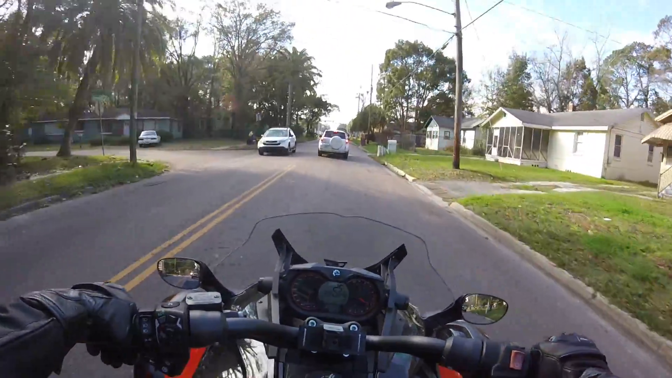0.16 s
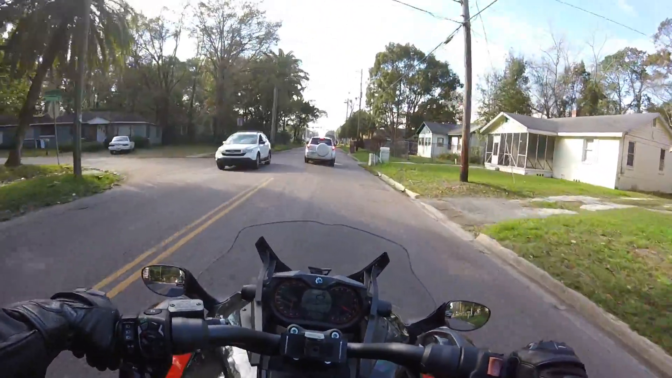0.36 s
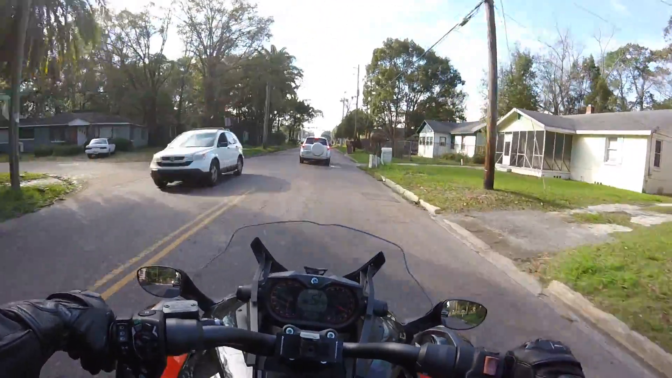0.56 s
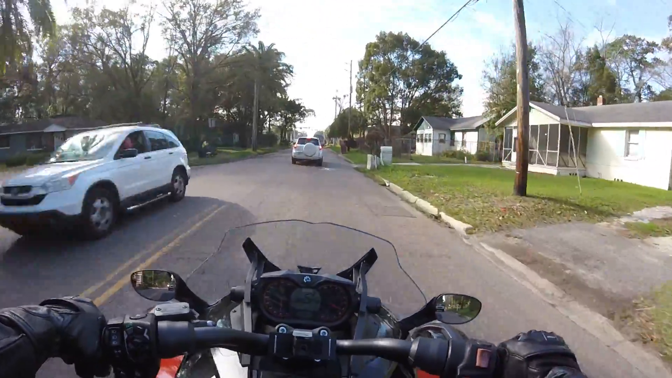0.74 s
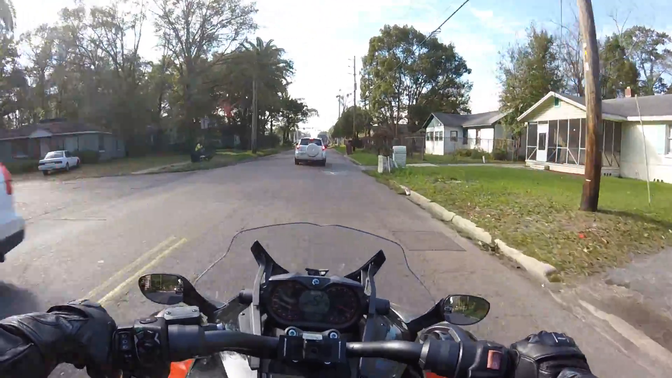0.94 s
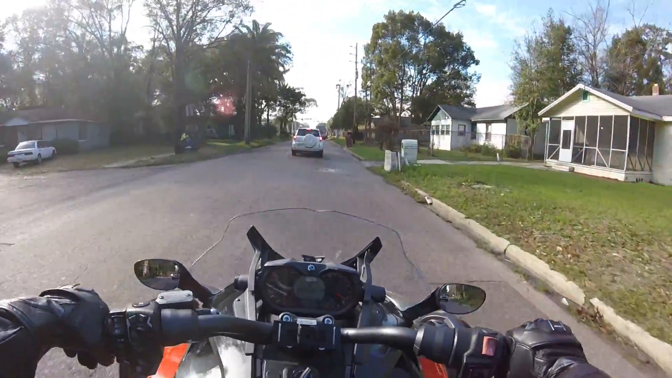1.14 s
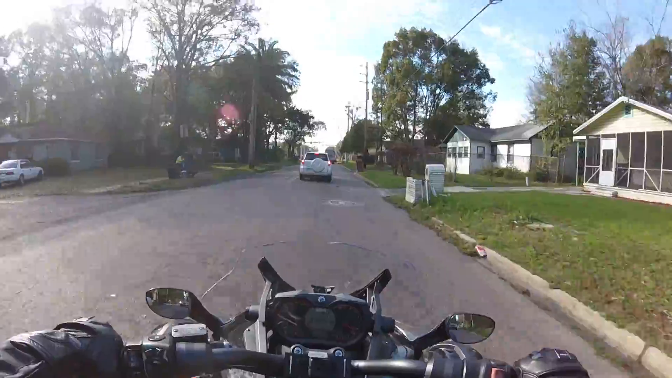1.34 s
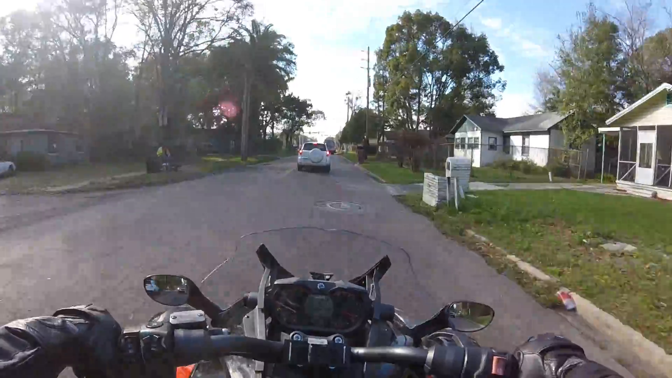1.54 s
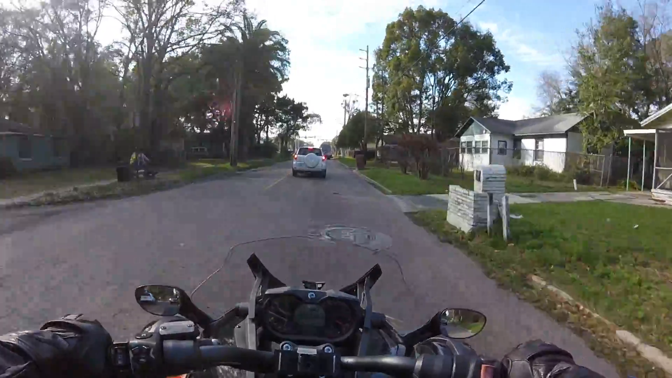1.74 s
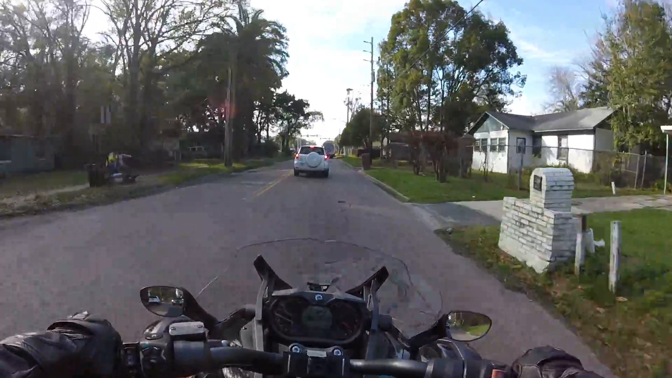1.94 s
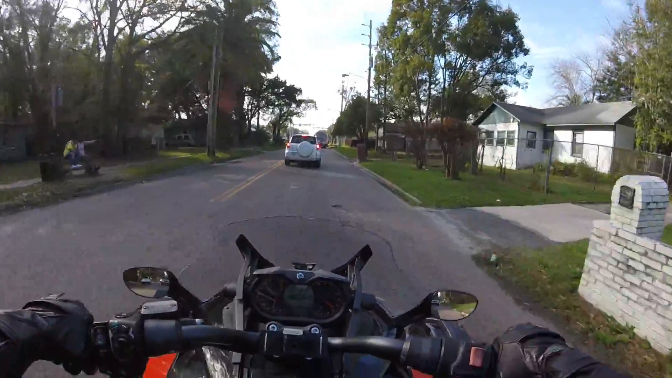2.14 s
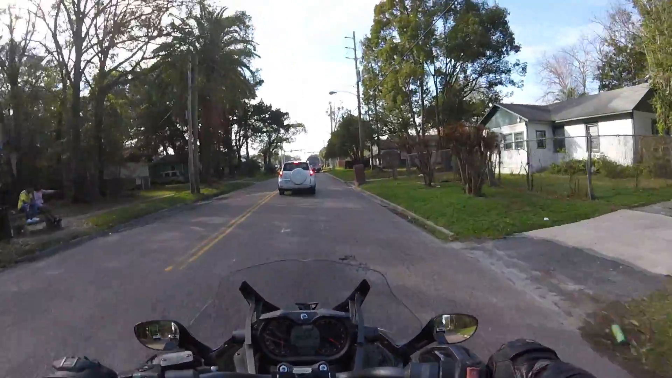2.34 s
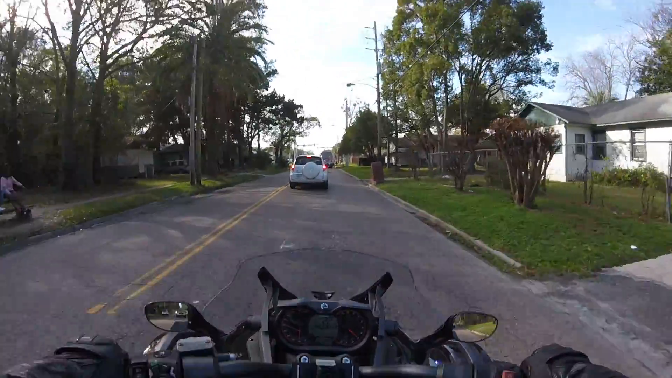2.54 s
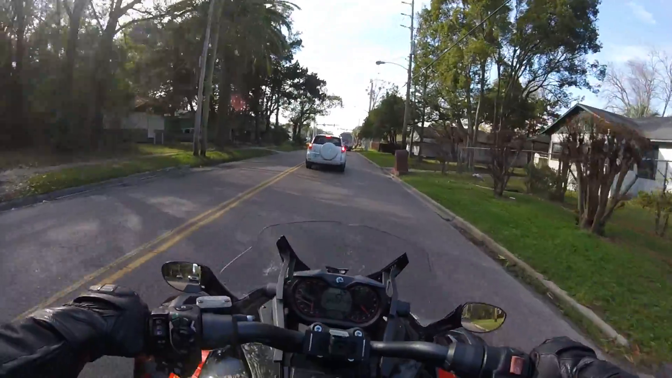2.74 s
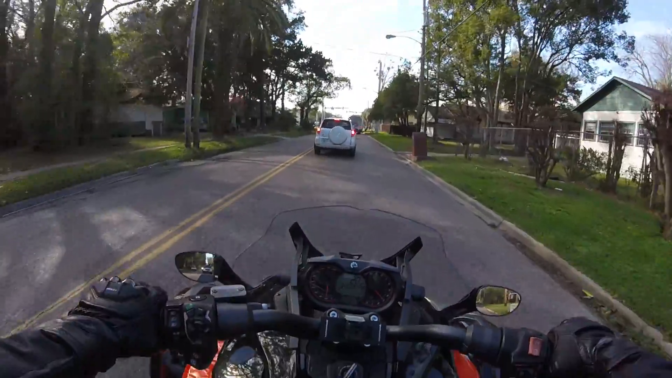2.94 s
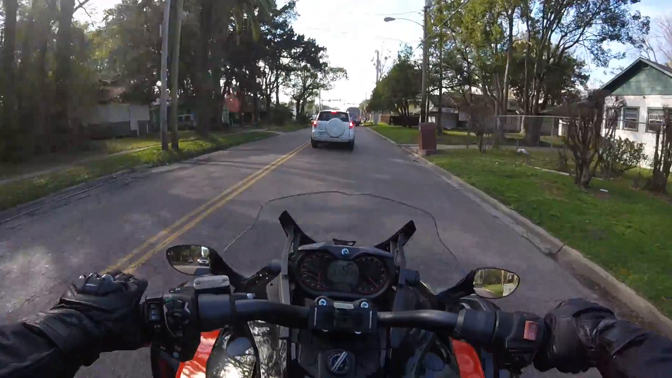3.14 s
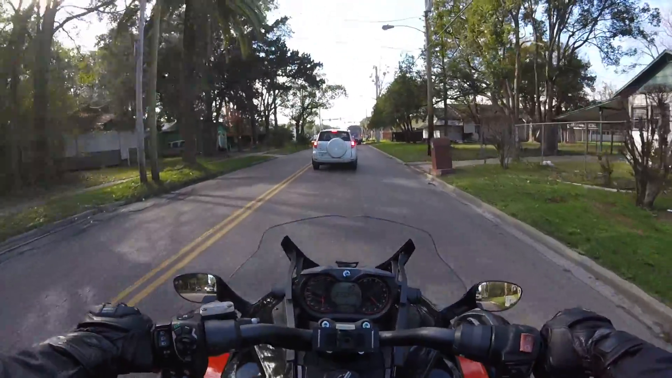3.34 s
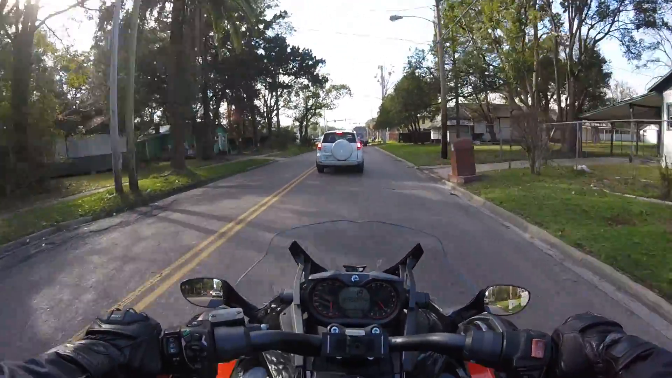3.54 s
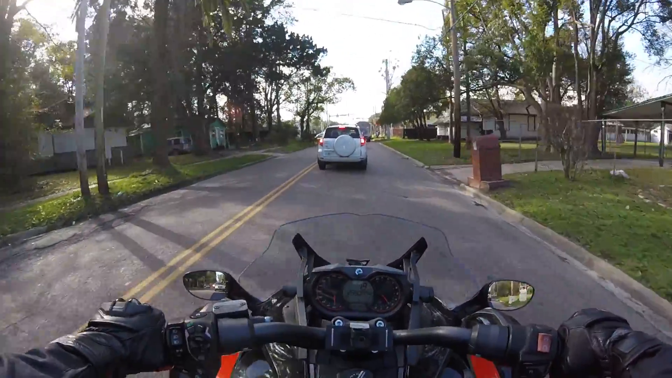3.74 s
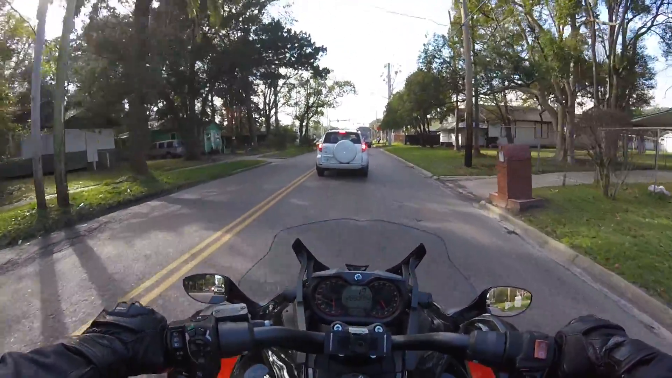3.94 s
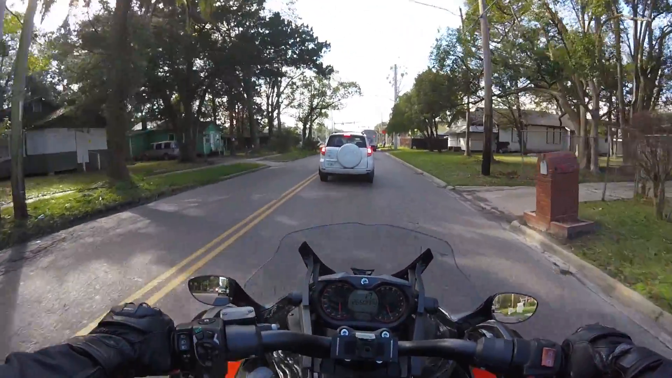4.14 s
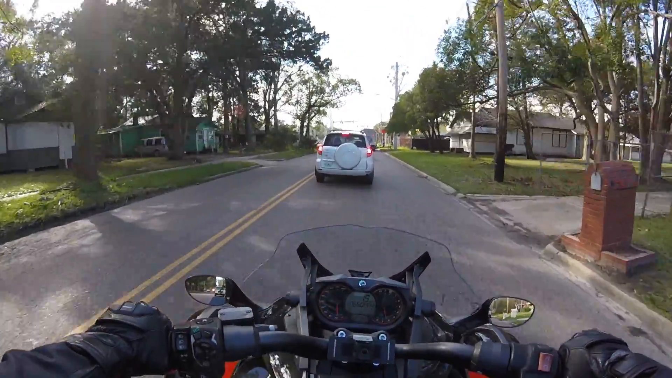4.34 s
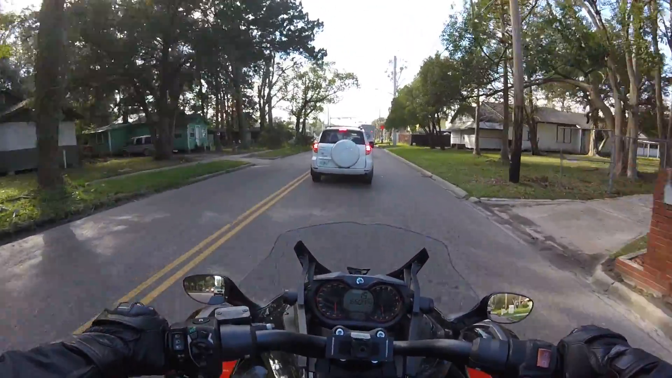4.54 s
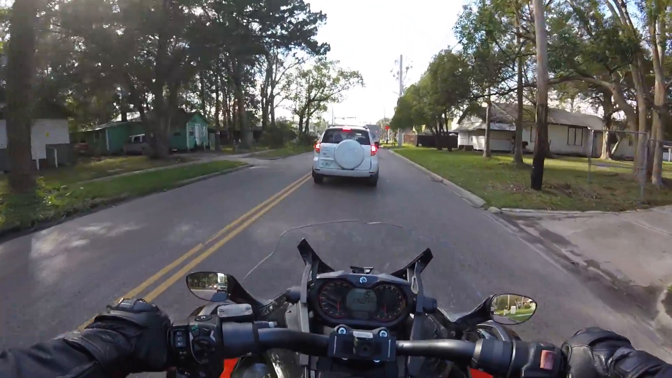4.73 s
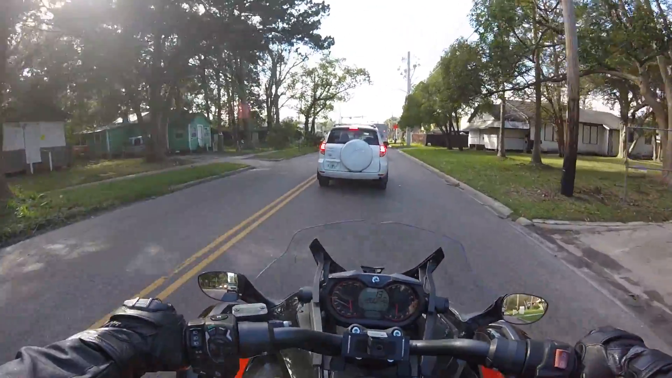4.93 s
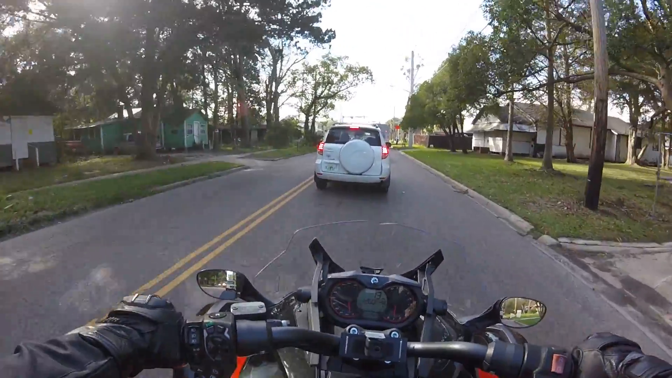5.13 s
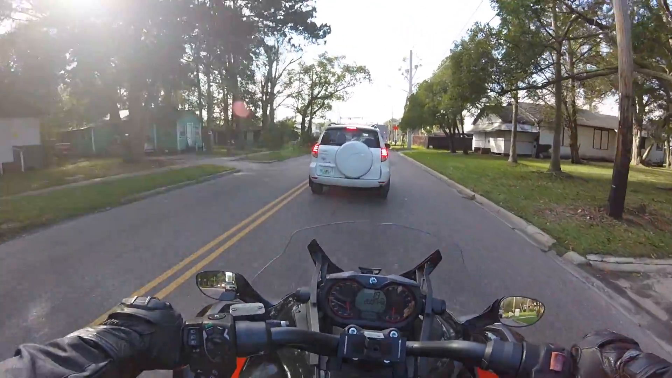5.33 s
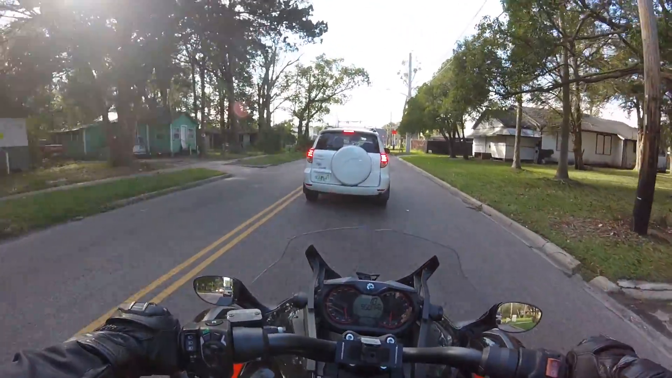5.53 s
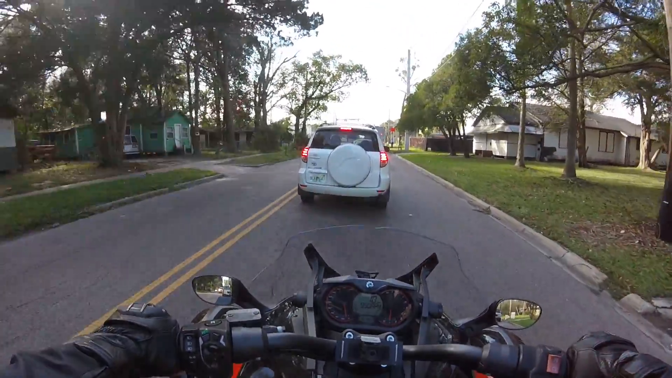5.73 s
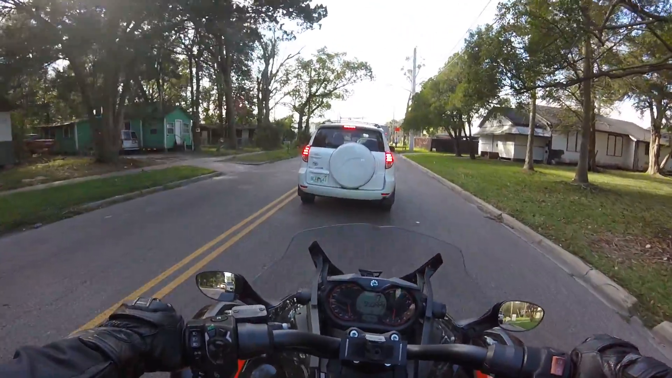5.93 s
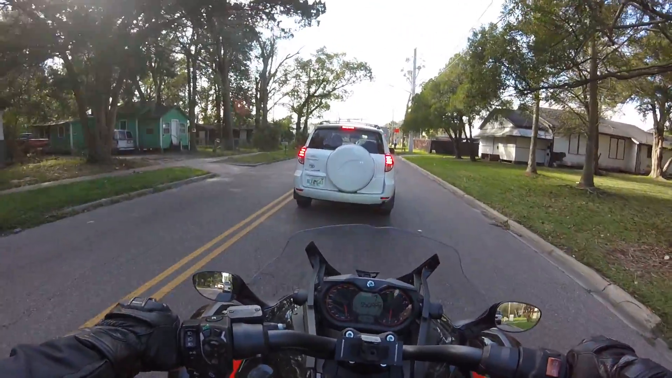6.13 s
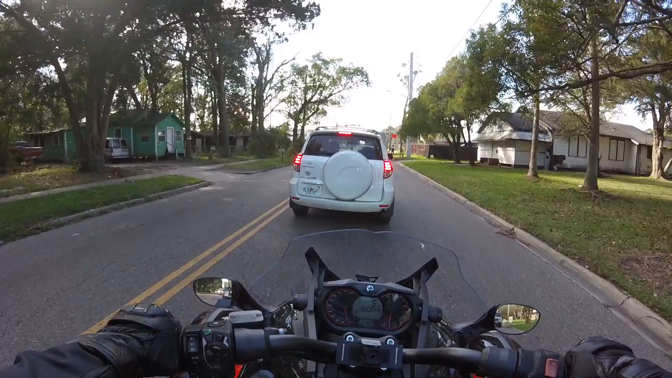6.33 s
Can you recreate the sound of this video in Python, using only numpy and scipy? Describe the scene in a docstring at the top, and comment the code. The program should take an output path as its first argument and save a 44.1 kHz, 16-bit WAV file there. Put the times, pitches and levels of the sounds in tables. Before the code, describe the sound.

From the rider's seat, a deep engine boom gives way to crackling deceleration, easing wind and a slow, lumpy idle behind a stopping car.

```python
"""On the rider's seat of a three-cylinder trike: it pulls, the throttle shuts and the exhaust burbles and pops,
then the clutch opens and the revs sink to a throbbing idle. The exhaust is a boom of clean tones, echoing puffs
and uneven bursts of noise; pops are impulses heard through the silencer. Intake, gears, crankcase and valves
are tones and rattles that follow the revs. Lumpy noise makes the wind, an oncoming car passes over street hum,
a handlebar switch clicks, injectors tick, and thin electrical and brake tones whistle."""
import sys
import numpy as np
from scipy import signal
from scipy.fft import rfft, irfft
from scipy.io import wavfile
from scipy.ndimage import map_coordinates

SR = 44100
rng = np.random.default_rng(int(sys.argv[2]) if len(sys.argv) > 2 else 0)


def transcribe(u):
    """Save the signal u as a 16-bit wav file named by the first command-line argument.

    u: samples, shape (n,) or (channels, n), limited to [-1, 1]; the rate is SR.
    q: integer samples, one column per channel.
    """
    v = np.clip(np.atleast_2d(u).T, -1, 1)
    q = np.round(v * 32767).astype(np.int16)
    wavfile.write(sys.argv[1], SR, q)


N = 281358
TIME = np.arange(N) / SR  # time of each sample [s]
# the throttle eases and then shuts, the popping stops, the clutch opens, the idle catches [s]
EASE_S, SHUT_S, BURBLE_END_S, CLUTCH_S, IDLE_S = 1.22, 1.59, 4.07, 4.24, 5.2
CHANGE_S, LEVER_S = 0.084, 0.43  # length of a quick change, and of a gradual one made by hand [s]


def amp(db):
    """Turn decibels into a gain."""
    return 10 ** (np.asarray(db) / 20)


def unit(x):
    """Scale a sound to an average (rms) strength of 1."""
    return x / np.sqrt(np.mean(x ** 2) + 1e-20)


def wobble(rate):
    """A smooth random curve with the given number of random points a second."""
    points = rng.standard_normal(int(N * rate / SR) + 4)
    return map_coordinates(points, [TIME * rate])


def ramp(s, length):
    """A smooth step from 0 to 1, centred on time s."""
    return .5 + .5 * np.sin(np.pi * np.clip((TIME - s) / length, -.5, .5))


def swell(s, half_length):
    """A bell-shaped rise and fall around time s."""
    return np.exp(-.5 * ((TIME - s) / half_length) ** 2)


def along(points, hz):
    """Level in dB of a (frequency [Hz], level [dB]) spectrum at the given frequencies."""
    at_hz, db = np.transpose(points)
    return np.interp(np.log(hz + 1), np.log(at_hz + 1), db)


def response(points, size=16384):
    """How a body with the given spectrum rings after a single tap, with nothing before the tap."""
    grid = np.fft.rfftfreq(size, 1 / SR)
    cepstrum = irfft(np.log(amp(along(points, grid))))
    # folding the second half onto the first makes the body answer as early as it can (minimum phase)
    cepstrum[1:size // 2] *= 2
    cepstrum[size // 2 + 1:] = 0
    return irfft(np.exp(rfft(cepstrum)))


def through(x, points):
    """Pass a sound through a body with the given spectrum."""
    return signal.fftconvolve(x, response(points))[:N]


def noise(points):
    """Noise coloured by a spectrum, with rms 1."""
    return unit(through(rng.standard_normal(N), points))


def blows(times, sizes):
    """Single impulses at the given times."""
    samples = np.round(np.asarray(times) * SR).astype(int)
    return np.bincount(samples, sizes, N)[:N]


def bursts(times, sizes, t60):
    """Dying puffs of noise that fall 60 dB in t60 seconds, each about as energetic as an impulse of its size."""
    fade = amp(-60 * TIME[:SR // 5] / t60)
    outline = signal.fftconvolve(blows(times, sizes), fade / np.linalg.norm(fade))[:N]
    return outline * rng.standard_normal(N)


def exhaust_levels():
    """Levels in dB of the two low orders, the puffs and the uneven burning, as each state gives way to the next."""
    # the exhaust in each state: (first order [dB], second order [dB], regular puffs [dB],
    # uneven burning [dB], drift of the first three levels [dB/s])
    pulling = (-18.5, -36.5, -30, -42.5, -3)
    easing = (-24, -32.5, -14.5, -44, 3)
    overrun = (-22.5, -38.5, -35, -31, 1.03)
    fading = (-21.5, -40, -38, -34.5, -23)
    coasting = (-32.5, -64, -41.5, -43, 2)
    idling = (-32.5, -48, -40, -49, 3)
    states = [(-CHANGE_S, CHANGE_S, pulling), (EASE_S, LEVER_S, easing), (SHUT_S, CHANGE_S, overrun),
              (BURBLE_END_S, CHANGE_S, fading), (CLUTCH_S, LEVER_S, coasting), (IDLE_S, CHANGE_S, idling)]
    levels = 0
    for start, length, state in states:
        first, second, puffs, uneven, drift = state
        change = drift * (TIME - start)
        now = np.array([first + change, second + change, puffs + change, np.full(N, uneven)])
        levels = levels + ramp(start, length) * (now - levels)
    return levels


def tail_pipe(x, count=6):
    """A puff runs up and down the pipe and comes out again, weaker after every round trip."""
    round_trip_s = .0153
    kept = 0.55  # share that returns after one round trip (0-1)
    return sum(kept ** k * np.interp(TIME - k * round_trip_s, TIME, x) for k in range(count))


def uneven_burning(turns, overrun, level_db):
    """Charges that burn unevenly: one impulse of random size per firing, heard through the pipe."""
    # the pipe under ragged, slower burning: (frequency [Hz], level [dB])
    burble = [(5, -49), (20, -16.5), (55, -7), (80, -3.5), (110, 4.5), (135, 1), (170, -4.5), (200, -7.5),
              (235, -12.5), (275, -25), (330, -21.5), (400, -37), (520, -22.5), (800, -54), (3000, -110)]
    # the burning is rougher for a moment as the idle catches: (time [s], half length [s], level [dB])
    catches = [(4.812, 0.024, 18), (5.18, 0.036, 8)]
    flare_db, flare_end_s = 2, 2.7  # the burble is strongest while leftover fuel burns off
    extra_db = flare_db * (ramp(SHUT_S, CHANGE_S) - ramp(flare_end_s, CHANGE_S))
    extra_db = extra_db + sum(db * swell(s, half_length) for s, half_length, db in catches)
    fired = np.diff(np.floor(turns), prepend=np.floor(turns[0]))  # 1 at each firing, 0 between
    # on the overrun strong and weak firings also tend to alternate
    alternate = 0.39 * overrun * np.cos(np.pi * turns)
    charges = fired * (rng.uniform(-0.93, 1, N) + alternate)
    return amp(level_db + extra_db) * unit(through(charges, burble))


def exhaust(turns, firing_hz, count=14):
    """One puff per firing echoes in the pipe; the two lowest orders (multiples of the firing rate) boom as tones."""
    # a regular puff as it enters the tail pipe: (frequency [Hz], level [dB])
    pipe = [(20, -23), (72, -9.5), (96, 4.5), (120, 3), (143, 4), (167, -0.5), (191, -8), (215, -9),
            (239, -20), (300, -41.5), (450, -45.5), (800, -56), (3000, -110)]
    pipe_hz, pipe_width_hz, pipe_lift_db = 135.4, 25.2, 11.5  # resonance that lifts the second order
    boom_lead = 1.11  # the slow push of gas comes ahead of the sharp puff [radians]
    first_db, second_db, puff_db, uneven_db = exhaust_levels()
    overrun = ramp(SHUT_S, CHANGE_S) - ramp(CLUTCH_S, LEVER_S)
    phase = 2 * np.pi * turns

    # the second order swells as it sinks through the resonance; the first wavers most on the overrun
    lift_db = pipe_lift_db / (1 + ((2 * firing_hz - pipe_hz) / pipe_width_hz) ** 2)
    waver_db = (.5 + overrun) * wobble(9)
    boom = amp(first_db + waver_db) * np.cos(phase + boom_lead)
    boom = boom + amp(second_db + lift_db) * np.cos(2 * phase + boom_lead)

    orders = range(3, count + 1)
    puff_shape = sum(amp(along(pipe, k * firing_hz)) * np.cos(k * phase) for k in orders)
    puffs = amp(puff_db + 1.6 * wobble(24)) * puff_shape  # the puffs differ in size

    # uneven burning fills the gaps between the orders
    return boom + tail_pipe(puffs) + uneven_burning(turns, overrun, uneven_db)


def afterfire(count=22):
    """Unburnt fuel pops in the silencer: a thud, a short crack, a slap off the end wall and a ragged spit of gas."""
    # the clear pops: (time [s], relative level [dB], level of the crack against the pop [dB])
    pops = [(1.684, -34, -14), (1.731, -32, -11), (1.786, -23, -11), (1.8313, -22.5, -9),
            (1.8743, -24.5, -8), (1.931, -23, -5.5), (2.066, -25.5, -10), (2.1125, -30, 0),
            (2.1922, -22.5, -4), (2.2155, -23, -1), (2.2972, -21, 0), (2.3435, -29.5, -3), (2.44, -23, -8),
            (2.496, -37.5, -10), (2.6865, -24, -9), (2.763, -30.5, -14), (2.9915, -27, -13),
            (3.3648, -29, -16), (3.505, -32, -16), (3.534, -36, -14), (3.56, -31.5, -14), (3.663, -26, -18),
            (3.693, -33, -10), (3.723, -33, -14), (3.753, -34, -16), (3.89, -30.5, -20),
            (4.044, -27.5, -10), (4.0615, -26, -24)]
    # the body of the silencer: (frequency [Hz], level [dB])
    silencer = [(25, -21), (80, 4), (135, 11.5), (200, 5.5), (260, -10), (320, -7), (370, -11), (420, -9),
                (490, -0.5), (590, -5), (645, -22), (700, -8), (810, -13), (950, -37.5), (1500, -36),
                (5000, -94)]
    # the sharp crack: (frequency [Hz], level [dB])
    crack_body = [(300, -51.5), (750, -9), (1050, -4.5), (1250, 9.5), (1600, -9.5), (2500, -20.5),
                  (8000, -57)]
    # gas leaving the silencer after a pop: (frequency [Hz], level [dB])
    spit_body = [(150, -20), (310, -6.5), (380, -13), (490, 9.5), (590, -5), (660, 0.5), (800, 0),
                 (950, -15), (1280, -7), (1700, -28), (5000, -73.5)]
    slap_s = 0.00371  # delay of the slap from the end wall [s]

    # small pops, one at a random moment in each equal slice of the overrun
    span_s = CLUTCH_S - LEVER_S / 2 - SHUT_S
    small_s = SHUT_S + span_s * (np.arange(count) + rng.random(count)) / count
    small = np.column_stack([small_s, rng.normal(-37.5, 1.5, count), np.full(count, -13.5)])
    s, db, crack_db = np.vstack([pops, small]).T

    thud = through(blows(s, amp(db + 42.0)), silencer)
    crack = through(blows(s, amp(db + crack_db + 26.0)), crack_body)
    slap = blows(s + slap_s, amp(db + 20))
    gas = bursts(s + slap_s, amp(db + 26.0), t60=0.07)
    return through(gas - slap, spit_body) - thud - crack


def tones(turns, table, waver_db):
    """Clean tones locked to the three-cylinder cycle, each wavering in level."""
    cycle = turns / 3
    return sum(amp(db + waver_db * wobble(3.6)) * np.sin(2 * np.pi * (k * cycle + rng.random()))
               for k, db in table)


def rattle(turns, body, repeat, depth, count=600, size=8192):
    """Contacts that partly repeat every three firings and swell with each stroke, heard through a body."""
    cycle = turns / 3
    pattern = irfft(np.r_[0, np.exp(2j * np.pi * rng.random(count))], size)
    repeated = np.interp(cycle % 1 * size, np.arange(size), pattern)
    locked = unit(through(repeated, body))
    contacts = np.sqrt(repeat) * locked + np.sqrt(1 - repeat) * noise(body)
    strokes = 1 + depth * (np.cos(2 * np.pi * turns) + 0.41 * np.cos(2 * np.pi * cycle))
    return unit(strokes * contacts)


def with_revs(revs, cruise_db, db_per_octave, least_db):
    """Gain that grows by some dB per doubling of revs and never falls below a least level."""
    return np.hypot(amp(cruise_db + db_per_octave * np.log2(revs)), amp(least_db))


def machinery(turns, revs):
    """Intake drone, gear whine, crankcase growl and valve clatter: the more load, the more alike the cycles."""
    # intake tones under load: (multiple of the three-cylinder cycle, relative level [dB])
    drone_tones = [(4, -47), (5, -46), (7, -52), (9, -49), (10, -48.5), (11, -59.5), (12, -54.5), (13, -54),
                   (14, -56), (15, -52), (16, -50), (19, -51), (20, -61.5), (21, -63.5), (22, -63.5),
                   (27, -62), (30, -61), (33, -58.5), (36, -57), (38, -59), (39, -55.5), (40, -57.5),
                   (42, -53)]
    # gear teeth meshing under load: (multiple of the three-cylinder cycle, relative level [dB])
    gear_tones = [(24.3, -58), (49.5, -53), (59.4, -60.5), (69.3, -55.5), (84, -53.5), (101, -56.5),
                  (107, -60.5)]
    # the cam chain, until the clutch opens: (multiple of the three-cylinder cycle, level [dB])
    chain_tones = [(18, -54)]
    # bodies of the intake, the crankcase and the valves: (frequency [Hz], level [dB])
    intake_body = [(100, -67.5), (200, -0.5), (300, 2), (355, -3.5), (480, 0.5), (545, -9), (595, -3),
                   (660, -11), (850, -14), (1100, -19.5), (2000, -68)]
    case_body = [(400, -40.5), (850, -15.5), (1080, -3.5), (1240, 1), (1360, 1.5), (1500, -6), (1650, 2),
                 (1850, -4.5), (2050, -10.5), (2600, -21), (5000, -55)]
    valve_body = [(1200, -51.5), (2150, -5), (2400, -2), (2650, 3), (2900, -4), (3400, 1), (3900, -12.5),
                  (4700, -15.5), (5200, -20.5), (5850, -15.5), (6700, -18), (8300, -32.5), (10500, -39.5),
                  (14000, -51)]

    # load (0-1) with the throttle open and shut at cruising revs; it falls as a power of the revs
    open_load, shut_load, load_power = 0.94, 0.66, 2.1
    shut = ramp(SHUT_S, CHANGE_S)
    load = np.clip((open_load + (shut_load - open_load) * shut) * revs ** load_power, 0, 1)

    # the drone softens by 4.5 dB with the throttle shut
    drone = load * amp(-1 - 4.5 * shut) * tones(turns, drone_tones, waver_db=3.0)
    gears = load * tones(turns, gear_tones, waver_db=1.5)
    chain = (1 - ramp(CLUTCH_S, LEVER_S)) * tones(turns, chain_tones, waver_db=2.5)

    # the intake rattle is 6.5 dB softer with the throttle open
    intake_gain = with_revs(revs, cruise_db=-40.5, db_per_octave=16.6, least_db=-60) * amp(-6.5 * (1 - shut))
    intake = intake_gain * rattle(turns, intake_body, repeat=0.35 * load, depth=0.028)
    case_gain = with_revs(revs, cruise_db=-44, db_per_octave=7.56, least_db=-65.5)
    case = case_gain * rattle(turns, case_body, repeat=0.17 + 0.28 * load, depth=0.057)
    valve_gain = with_revs(revs, cruise_db=-48, db_per_octave=6.75, least_db=-73) * amp(2.28 * load)
    valves = valve_gain * rattle(turns, valve_body, repeat=0.053 + 0.07 * load, depth=0.099)
    return drone + gears + chain + intake + case + valves


def injection(turns):
    """The fuel pump and injectors sizzle at a steady level and tick three times per firing."""
    # fuel pump and injectors: (frequency [Hz], level [dB])
    pump = [(1100, -24), (1500, -10), (1600, -6), (1655, 13.5), (1710, -4.5), (1830, -16), (1950, -2.5),
            (2050, -15), (2400, -6.5), (2620, 6.5), (2780, -5), (2900, -13.5), (3340, -3.5), (3430, 3),
            (3520, -6.5), (3900, -17), (5200, -18), (5850, -9.5), (6600, -18.5), (10500, -24.5),
            (13000, -41)]
    ticks = np.sin(3 * np.pi * turns) ** 6
    sizzle = rattle(turns, pump, repeat=0.36, depth=0.2)
    return amp(-60.5) * unit((1 + ticks) * sizzle)


def switch():
    """Dry plastic clicks at the handlebar: a snap, then a brief rattle."""
    # the clicks: (time [s], relative level [dB])
    clicks = [(2.545, -25), (2.6236, -20.5), (2.7095, -33), (3.125, -29), (3.445, -34)]
    # the plastic switch housing: (frequency [Hz], level [dB])
    housing = [(700, -57.5), (1150, -14.5), (1350, 1.5), (1680, 4), (2100, -4.5), (2500, -16.5),
               (3300, -12), (4000, -28), (4800, -24.5), (6500, -43), (10000, -61)]
    s, db = np.transpose(clicks)
    snap = blows(s, amp(db + 30))
    after = bursts(s + 0.0016, amp(db + 20.5), t60=0.05)
    return through(snap + after, housing)


def wind():
    """Lumpy buffeting on the microphone, with a few gusts; it sinks as the trike slows."""
    # colour of the buffeting: (frequency [Hz], level [dB])
    buffet = [(8, -9), (18, -1.5), (30, -2), (42, -13), (56, -2.5), (70, -12), (100, -21.5), (200, -29),
              (500, -49.5), (2000, -100)]
    # the gusts: (time [s], half length [s], level [dB])
    gust_table = [(0.165, 0.047, -21.5), (0.944, 0.17, -23), (1.84, 0.19, -20.5), (2.57, 0.19, -26.5),
                  (4.25, 0.075, -24.5)]
    wind_db, wind_drop_db = -29, 21.5  # level at speed, and its fall
    slow_s, slowing_s = 5.1, 3.6  # middle and length of the braking [s]
    steady = amp(wind_db - wind_drop_db * ramp(slow_s, slowing_s))
    gusts = sum(amp(db) * swell(s, half_length) for s, half_length, db in gust_table)
    lumps = amp(0.45 * wobble(6.3))
    return np.hypot(steady, gusts) * unit(noise(buffet) * lumps)


def passing_car():
    """Tyre roar of an oncoming car, mixed with its reflection, whose delay is longest as the car is nearest."""
    # colour of the tyre roar: (frequency [Hz], level [dB])
    tyre_colour = [(150, -22.5), (500, 0), (800, 4), (1200, -5), (2500, -10), (8000, -57)]
    pass_s, pass_width_s = 1.074, .17  # when the car is nearest, and how long it takes to go by [s]
    sweep_hz = 675  # lowest pitch of the sweep that roar and reflection make together
    tyres = noise(tyre_colour)
    nearness = 1 / np.hypot(1, (TIME - pass_s) / pass_width_s)
    reflection = np.interp(TIME - nearness / sweep_hz, TIME, tyres)
    return amp(-48.5) * swell(pass_s, 0.29) * unit(tyres + 0.5 * reflection)


def street():
    """The faint distant hum of the street, as steady coloured noise."""
    # colour of the hum: (frequency [Hz], level [dB])
    hum = [(100, -5), (300, -7), (750, -2.5), (1000, -4.5), (2000, -13), (8000, -35.5)]
    return amp(-63.0) * noise(hum)


def whistle(hz, waver_hz):
    """A thin tone of rms 1 whose pitch wavers at random."""
    return unit(np.sin(2 * np.pi * np.cumsum(hz + waver_hz * wobble(150)) / SR))


def whines():
    """A faint steady electrical whine, and brake pads that sing twice."""
    # the brake pads: (time [s], half length [s], level [dB])
    squeaks = [(4.312, .05, -71), (4.561, .04, -83)]
    brakes = sum(amp(db) * swell(s, half_length) for s, half_length, db in squeaks)
    electrical = amp(-86) * whistle(hz=9650, waver_hz=8)
    return electrical + brakes * whistle(hz=5700, waver_hz=115.5)


def scene():
    """Everything at the rider's seat, with the engine parts sharing one count of firings."""
    # engine speed: (time [s], firings a second [Hz])
    speed = [(0, 97.8), (.32, 95.5), (.52, 94.95), (.66, 94.66), (.8, 93.53), (1, 94.64), (1.16, 95.9),
             (1.32, 93.07), (1.54, 95.38), (1.67, 88.77), (1.85, 89.84), (2.22, 86.7), (2.42, 81.93),
             (2.68, 80.61), (3.04, 76.15), (3.35, 73.4), (3.75, 67.01), (3.88, 63.37), (4.1, 51.72),
             (4.38, 36.74), (4.88, 27.51), (5.17, 24.22), (5.65, 24), (5.79, 24.58), (5.93, 23.49),
             (6.38, 23.46)]
    cruise_hz = 95  # firing rate at cruising revs
    beat_s = 5.727  # one idle firing, from which the others are counted [s]
    knot_s, knot_hz = np.transpose(speed)
    firing_hz = np.interp(TIME, knot_s, knot_hz)
    turns = np.cumsum(firing_hz * (1 + .002 * wobble(20))) / SR  # firings so far, slightly unsteady
    turns = turns - np.interp(beat_s, TIME, turns)
    engine = exhaust(turns, firing_hz) + afterfire() + machinery(turns, firing_hz / cruise_hz) + injection(turns)
    surroundings = switch() + wind() + passing_car() + street() + whines()
    return (engine + surroundings)[None]


def record(dry):
    """Roll off gently below 9 Hz and steeply above 13 kHz."""
    low_cut = signal.butter(1, 9, "highpass", fs=SR, output="sos")
    high_cut = signal.butter(14, 13000, fs=SR, output="sos")
    return signal.sosfilt(np.vstack([low_cut, high_cut]), dry)


dry = scene()
out = record(dry)
transcribe(out)
```